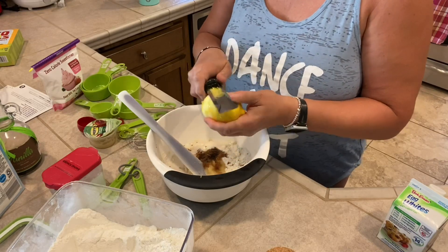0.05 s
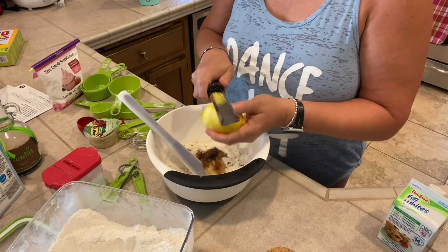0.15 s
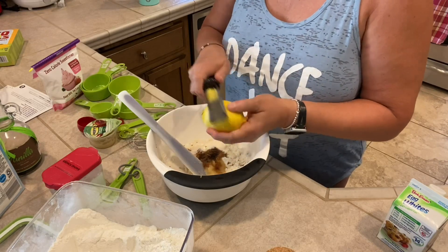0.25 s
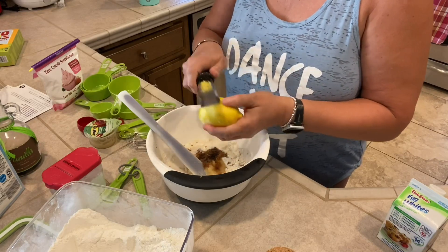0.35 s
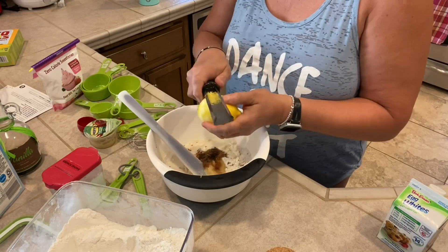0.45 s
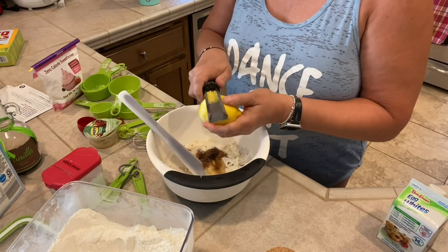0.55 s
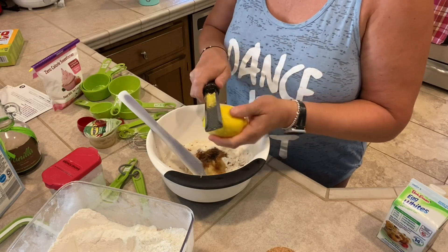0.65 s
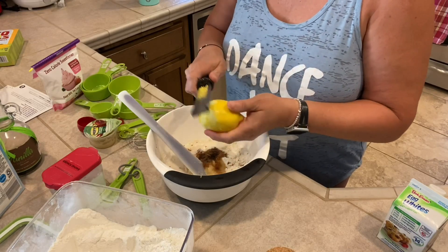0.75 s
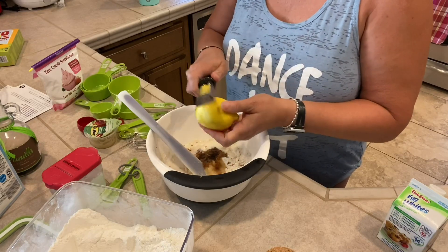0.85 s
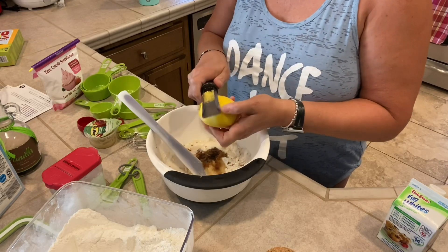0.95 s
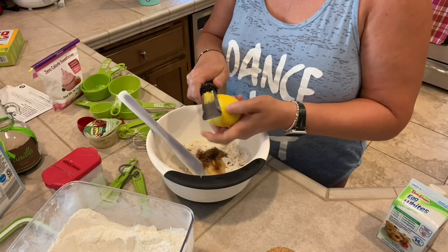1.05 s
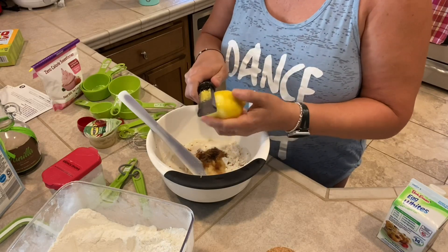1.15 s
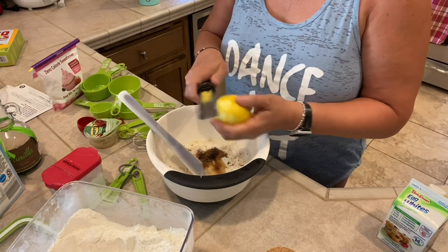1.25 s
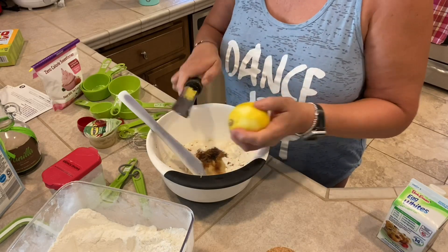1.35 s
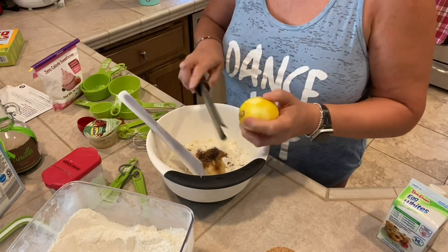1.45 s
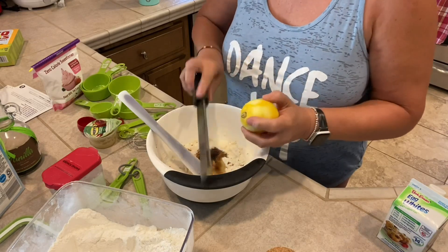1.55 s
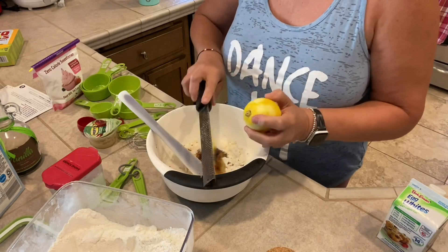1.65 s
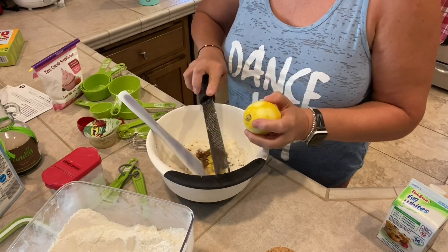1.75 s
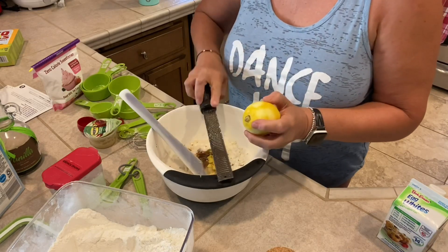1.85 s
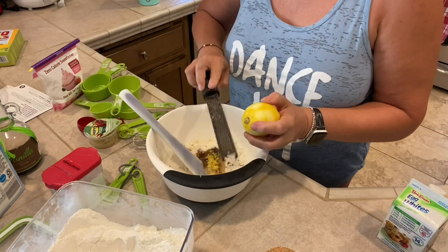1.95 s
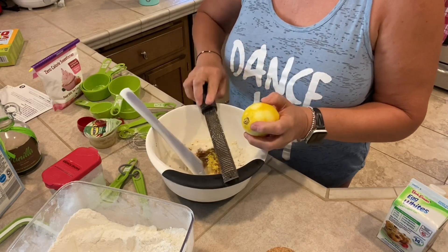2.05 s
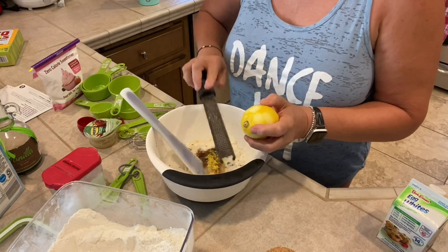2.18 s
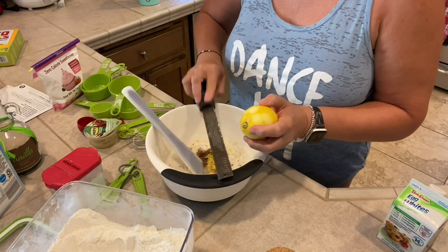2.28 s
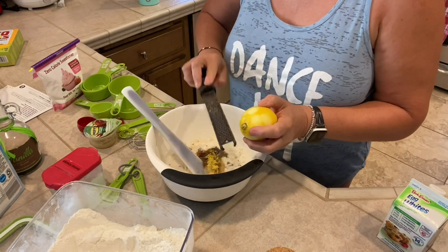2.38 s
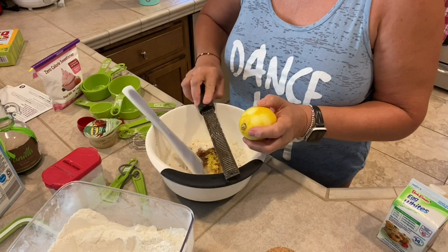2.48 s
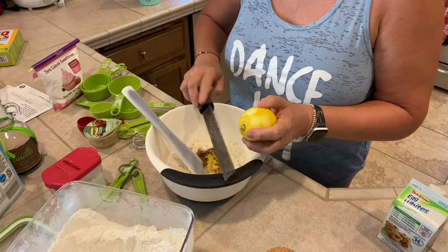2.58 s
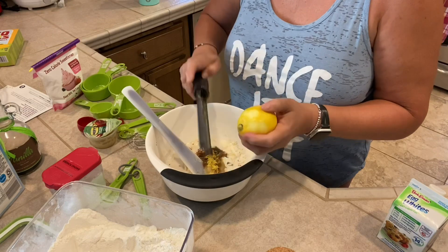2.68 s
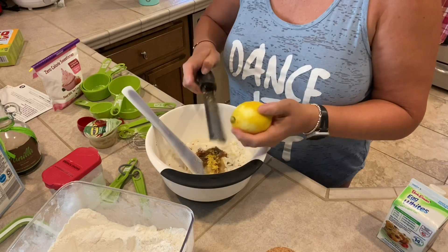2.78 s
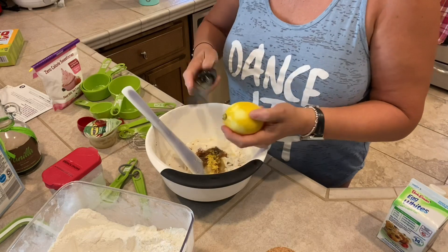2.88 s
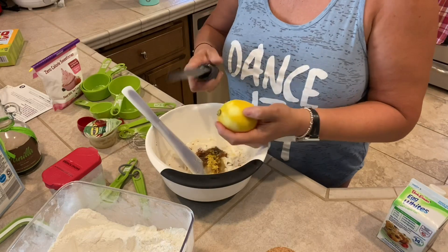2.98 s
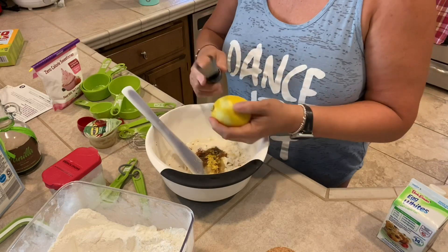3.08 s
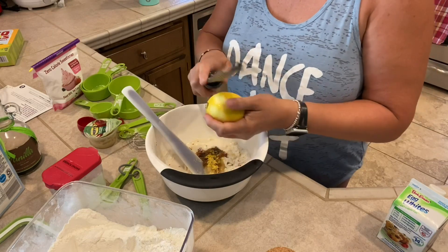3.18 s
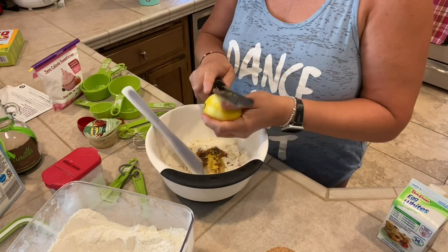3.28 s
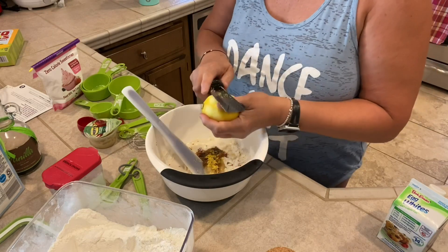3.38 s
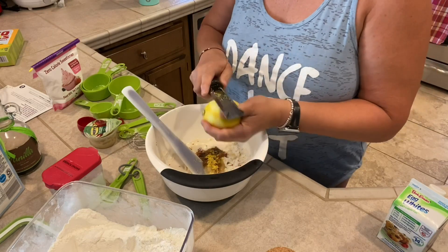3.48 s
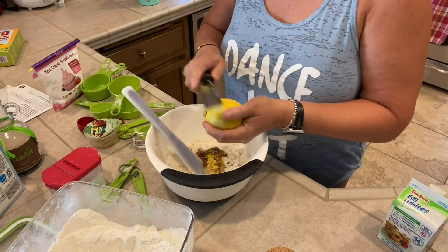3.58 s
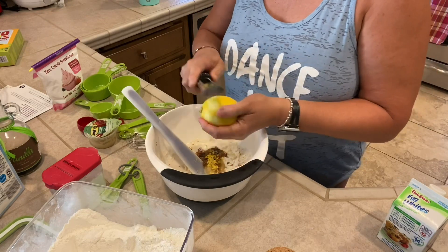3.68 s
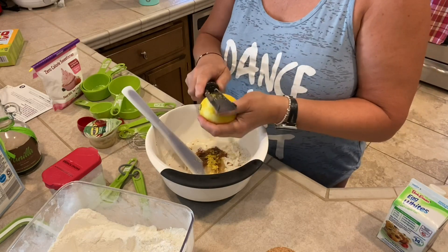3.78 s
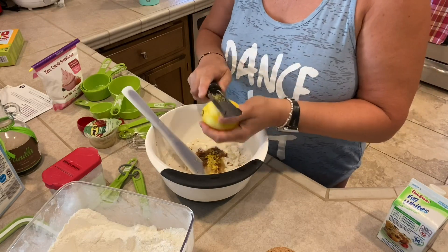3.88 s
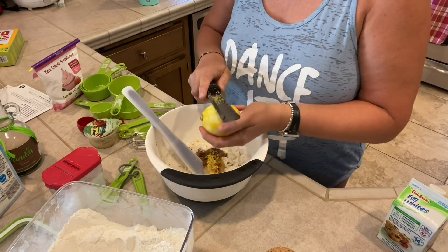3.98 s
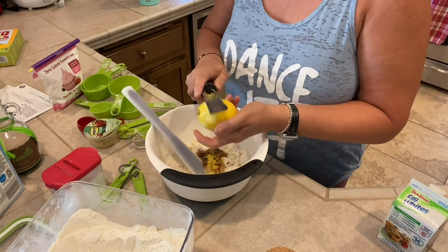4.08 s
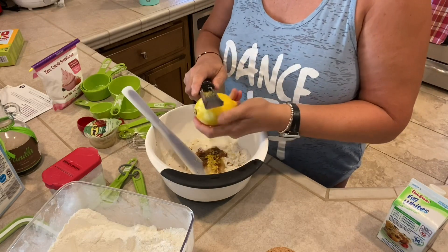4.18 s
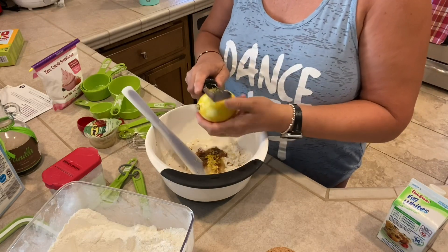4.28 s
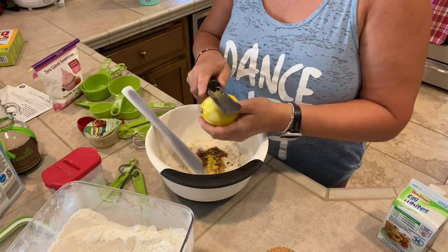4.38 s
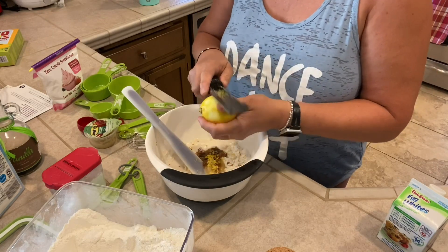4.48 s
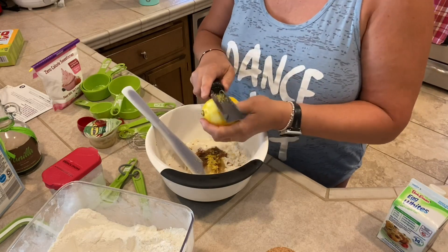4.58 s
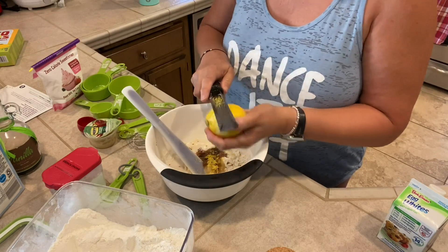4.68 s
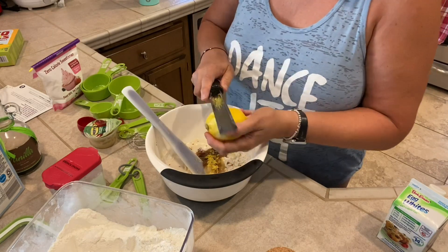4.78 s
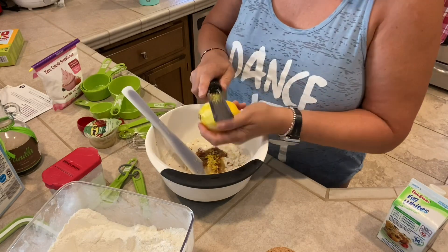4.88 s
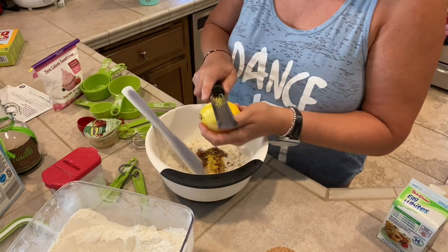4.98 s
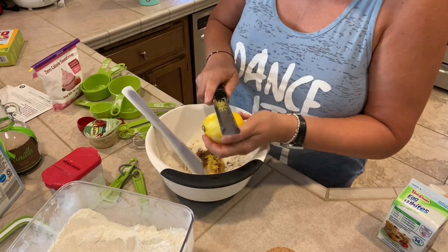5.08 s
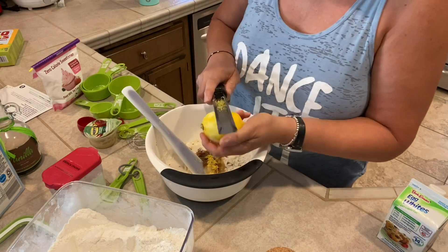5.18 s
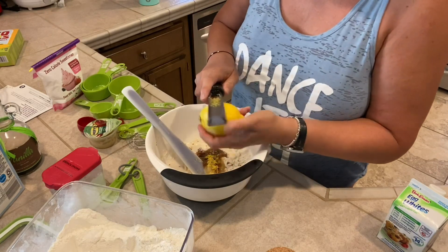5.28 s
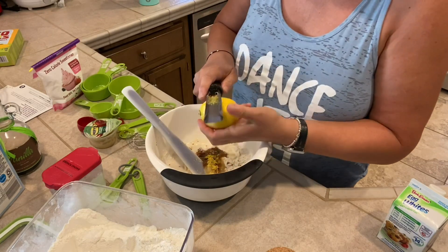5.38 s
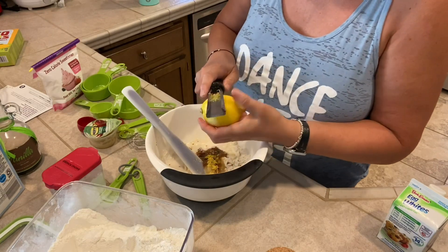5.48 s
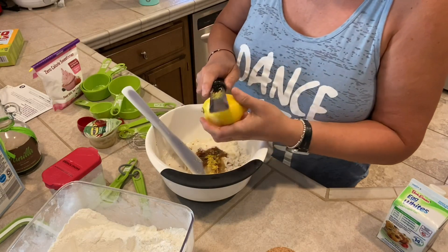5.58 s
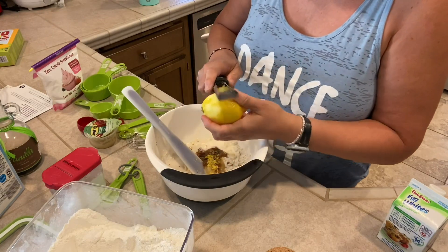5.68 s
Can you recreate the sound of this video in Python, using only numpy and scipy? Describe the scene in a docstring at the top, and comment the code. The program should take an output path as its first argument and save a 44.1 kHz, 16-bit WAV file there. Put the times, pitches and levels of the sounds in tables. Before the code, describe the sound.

A handheld steel zester scrapes lemon skin in brief, quiet, grainy strokes with a slight metallic ring. Between the second and third strokes, five loud hollow knocks on a plastic bowl run about a fifth of a second apart, the first weak. Scraping then resumes in short rasps, ending with a light graze and dull rubs. Close microphones, short bright room echo, steady low motor hum beneath.

```python
"""Lemon zesting over a bowl

A lemon is drawn over a hand zester in short strokes: a dense patter of tiny tears that rings the blade.
Between the second and third strokes come five knocks: the zester meets the rim, and an instant later the
plastic bowl thumps. Both are decaying mode pairs with a noise snap and rattle. Soft rubs, small ticks and
low counter thuds fill in around them. A tiled kitchen answers with dense echoes of noise. Appliances rumble
and hum underneath as coloured noise and wavering tones, and two close microphone ports hear it all."""
import sys
import numpy as np
from scipy import signal
from scipy.fft import rfft, irfft, next_fast_len
from scipy.io import wavfile

SR = 44100
rng = np.random.default_rng(int(sys.argv[2]) if len(sys.argv) > 2 else 0)


def dump(signal):
    """Clip the signal to [-1, 1] and save it as 16-bit WAV at the path in sys.argv[1]."""
    limited = np.clip(np.atleast_2d(signal).T, -1, 1)
    pcm = np.round(limited * 32767).astype(np.int16)
    wavfile.write(sys.argv[1], SR, pcm)


N = 253414
PAD = next_fast_len(N + SR)   # room for tails beyond the end
BINS = np.maximum(np.arange(PAD // 2 + 1) * SR / PAD, 1)   # Hz of each frequency bin


def from_db(db):
    """Decibels to an amplitude factor."""
    return 10 ** (np.asarray(db) / 20)


def rms_one(x):
    """Scale to an RMS of 1."""
    return x / np.sqrt(np.mean(x ** 2) + 1e-20)


def at_hz(points):
    """A (Hz, value) table read at every frequency bin, straight on a log axis."""
    hz, value = np.transpose(points)
    return np.interp(np.log(BINS), np.log(np.maximum(hz, 1)), value)


def shaped(x, response):
    """Filter by a response given at every frequency bin."""
    return irfft(rfft(x, PAD) * response, PAD)[..., :N]


def pair(spectra, alike):
    """Two unrelated spectra mixed into left and right: likeness 1 is the same, -1 is opposite."""
    alike = np.clip(at_hz(alike), -1, 1)
    shared = np.sqrt(1 + alike) * spectra[0]
    opposed = np.sqrt(1 - alike) * spectra[1] * [[1], [-1]]
    return (shared + opposed) / np.sqrt(2)


def drift(rate_hz):
    """Random wandering of spread 1: noise smoothed by two equal poles."""
    r = np.exp(-2 * np.pi * rate_hz / SR)
    smooth = signal.lfilter([1], [1, -2 * r, r * r], rng.standard_normal(N + SR))
    return rms_one(smooth[SR:])   # the first second lets the filter settle


def resonate(x, hz, width_hz):
    """One resonance that passes its centre pitch at about unit level."""
    r = np.exp(-np.pi * width_hz / SR)
    feedback = [1, -2 * r * np.cos(2 * np.pi * hz / SR), r * r]
    return signal.lfilter([(1 - r * r) / 2, 0, (r * r - 1) / 2], feedback, x)


def ring(blows, hz, t60):
    """Each blow starts a sine that falls 60 dB in t60 seconds."""
    r, w = from_db(-60 / (t60 * SR)), 2 * np.pi * hz / SR
    return signal.lfilter([0, np.sin(w)], [1, -2 * r * np.cos(w), r * r], blows)


def clicks_at(times, sizes):
    """Single-sample impulses over a vanishing floor."""
    out = np.full(N, 1e-18)
    out[np.round(np.asarray(times) * SR).astype(int)] = sizes
    return out


def dying(x, t60):
    """Each impulse becomes an envelope that falls 60 dB in t60 seconds."""
    return signal.lfilter([1], [1, -from_db(-60 / (t60 * SR))], x)


# Stereo likeness of blade and bowl. Each row: frequency in Hz, left-right likeness from -1 to 1.
NEAR_LIKENESS = [(1500, 1), (3500, 0.22), (6000, 0.49), (8500, 1), (16000, 0.58)]


def wide(x, spectrum):
    """Two draws of a source, coloured and spread: a broad body sends each port a slightly different sound."""
    coloured = pair(rfft(x, PAD), NEAR_LIKENESS) * from_db(at_hz(spectrum))
    return rms_one(irfft(coloured, PAD)[:, :N])


# Colour of the tearing teeth. Each row: frequency in Hz, relative density in dB per Hz.
TEETH_COLOUR = [(400, -18.5), (800, -1.5), (1400, -3.5), (2300, -1.5), (3600, -2.5), (5000, -2.5),
                (6200, -4.5), (7800, -1.5), (9000, -5), (15800, -7)]
# Steel blade resonances. Each row: centre in Hz, width in Hz, level in dB relative to the patter feeding it.
BLADE_MODES = [(1515, 120, -10), (2880, 180, -5), (3350, 130, -2), (3563, 120, 3.5), (3840, 44, 4)]


def strokes():
    """Teeth tear the peel in a dense random patter that also rings the steel blade."""
    sizes_db = 3 * np.minimum(rng.exponential(1, (2, N)), 3)   # many small tears, few big ones
    sizes = from_db(sizes_db) * rng.choice([-1, 1], (2, N))
    tears = (rng.random(N) < 12000 / SR) * sizes   # about 12000 tears per second
    unevenness = from_db(1.1 * drift(40.0))
    patter = wide(tears * unevenness, TEETH_COLOUR)
    blade = sum(from_db(db) * resonate(patter, hz, width) for hz, width, db in BLADE_MODES)
    return pressure() * rms_one(patter + blade)


LANDING_DB_PER_S, EASING_DB, LIFTING_DB_PER_S = 605, 2.5, 318   # rise to the bite, later sag, fade after lift-off
# Zesting strokes. Each row: teeth bite in seconds, fullest in seconds, lift-off in seconds,
# level at the fullest in dB, bite below that level in dB.
ZEST_STROKES = [(.002, 0.1, .142, -48.5, 17), (0.461, 0.534, 0.59, -44, 22.5),
                (3.391, 3.44, 3.45, -47.5, 4), (3.785, 3.842, 3.882, -44.5, 8.5),
                (4.531, 4.62, 4.663, -45.5, 11), (4.958, 5.005, 5.038, -46, 6.5)]
# Light grazes of the teeth between strokes. Each row: fullest in seconds, swell in seconds,
# fade in seconds (each over 20 dB), level at the fullest in dB.
TOOTH_GRAZES = [(.392, .02, 0.092, -67), (.918, .07, 0.13, -67.5), (1.2, 0.084, 0.079, -64.5),
                (1.294, 0.038, 0.04, -61.5), (1.47, 0.18, 0.3, -67), (2.835, .15, 0.051, -64.5),
                (2.989, 0.11, 0.096, -75), (3.08, 0.11, .3, -73), (3.24, .03, 0.092, -77.5),
                (3.725, 0.028, 0.044, -74.5), (4.08, 0.074, 0.097, -67.5), (4.39, .12, 0.14, -72.5),
                (4.88, 0.032, 0.056, -71), (5.3, 0.12, 0.056, -60), (5.54, 0.078, .15, -82)]


def pressure():
    """How hard the teeth cut: each stroke lands, builds, sags a little and lifts off; grazes swell and fade."""
    t = np.arange(N) / SR
    out = 0
    for bite, fullest, lift, db, below_db in ZEST_STROKES:
        shape_db = np.interp(t, [bite, fullest, lift], [-below_db, 0, -EASING_DB])
        landing_db = LANDING_DB_PER_S * np.maximum(bite - t, 0)
        lifting_db = LIFTING_DB_PER_S * np.maximum(t - lift, 0)
        out = out + from_db(db + shape_db - landing_db - lifting_db)
    for fullest, swell, fade, db in TOOTH_GRAZES:
        distance = np.maximum((fullest - t) / swell, (t - fullest) / fade)
        out = out + from_db(db - 20 * distance)
    return out


# Colour of the loose rattle. Each row: frequency in Hz, relative density in dB per Hz.
CLATTER_COLOUR = [(250, -21), (600, -8), (1200, -3), (2300, -1), (3500, -8.5), (5500, -13), (8000, -13.5),
                  (16000, -25)]


def struck(hits, modes, spread_db, swell_cycles, rattle_t60):
    """Blows ring mode pairs by chance amounts, hardness tilting the highs; a bright snap and uneven rattle join."""
    s, drive_db, hardness, snap_db, rattle_db = np.transpose(hits)
    luck = rng.standard_normal((len(s), len(modes), 2))
    ringing = 0
    for k, (low_hz, spacing, level_db, t60) in enumerate(modes):
        for twin, hz in enumerate([low_hz, low_hz + spacing]):
            tilt_db = hardness * np.log2(hz / 400)
            db = drive_db + level_db + tilt_db + spread_db * luck[:, k, twin]
            blows = clicks_at(s, from_db(db) * (-1) ** k)   # neighbouring modes start in opposite directions
            # taking away a second decay makes the mode swell in; low modes swell later
            ringing = ringing + ring(blows, hz, t60) - ring(blows, hz, swell_cycles / hz)
    snap = dying(clicks_at(s, from_db(snap_db)), .008) * rng.standard_normal(N)
    snap = signal.sosfilt(signal.butter(1, 2000.0, "high", fs=SR, output="sos"), snap)
    uneven = from_db(2 * drift(300))
    clatter = wide(rng.standard_normal((2, N)), CLATTER_COLOUR)
    rattle = uneven * dying(clicks_at(s, from_db(rattle_db)), rattle_t60) * clatter
    return ringing + snap + rattle


# The bowl thumps. Each row: start in seconds, drive in dB, hardness in dB per octave about 400 Hz,
# snap drive in dB, rattle start in dB.
BOWL_THUMPS = [(1.5315, -20.5, 1.5, -41, -33), (1.785, -12, 1.5, -15.5, -31.5),
               (1.9745, -8, 2, -20.5, -23.5), (2.205, -13.5, -0.5, -25.5, -34),
               (2.4075, -6.5, 1.5, -23.5, -26)]
# Bowl modes in close pairs. Each row: lower pitch in Hz, pair spacing in Hz, relative drive in dB, t60 in seconds.
BOWL_MODES = [(70.5, 6, -21, 0.082), (110.4, 16, -12.5, 0.15), (158, 14, -12, 0.16),
              (219.5, 17.8, -5, 0.05), (358.6, 29.5, -3.5, 0.098), (513.5, 20, -7.5, 0.053),
              (551.5, 25, -11, 0.072), (622.4, 22, -16, 0.073), (718, 18.3, -23, 0.27),
              (1053, 27, -3, 0.006)]


def thumps():
    """The plastic bowl booms in low mode pairs that swell in after each blow."""
    return struck(BOWL_THUMPS, BOWL_MODES, spread_db=2.0, swell_cycles=2.35, rattle_t60=0.086)


# Zester meets the rim. Each row: start in seconds, drive in dB, hardness in dB per octave about 400 Hz,
# snap drive in dB, rattle start in dB.
RIM_KNOCKS = [(1.5304, -28.5, -2.5, -38.5, -41.5), (1.771, -22.5, 0.5, -35, -34.5),
              (1.968, -18, 0.5, -38.5, -29), (2.1905, -20, -1, -32.5, -30.5),
              (2.3995, -20, -1.5, -31.5, -29)]
# Rim modes in close pairs. Each row: lower pitch in Hz, pair spacing in Hz, relative drive in dB, t60 in seconds.
RIM_MODES = [(566.6, 56, 7, 0.033), (888, 27, -11, 0.027), (1139, 39, -3, 0.068), (1730, 30, -11.5, .03)]


def rim():
    """A round rim rings briefly in close mode pairs when the zester meets it."""
    return struck(RIM_KNOCKS, RIM_MODES, spread_db=4.5, swell_cycles=8.5, rattle_t60=0.17)


COUNTER_HZ, COUNTER_T60_S = 68, 0.17
# The counter's answers. Each row: start in seconds, drive in dB.
COUNTER_THUDS = [(1.584, -35.5), (1.851, -33), (2.256, -24.5)]


def thuds():
    """The counter answers with one low mode that swells in softly before it decays."""
    s, db = np.transpose(COUNTER_THUDS)
    pushes = clicks_at(s, from_db(db))
    return ring(pushes, COUNTER_HZ, COUNTER_T60_S) - ring(pushes, COUNTER_HZ, 0.027)


# Dull rubs of hand, fruit and blade between strokes. Each row: start in seconds, swell in seconds,
# fade in seconds, level at the fullest in dB, top of the band in Hz.
DULL_RUBS = [(.19, 0.1, 0.094, -58.5, 1090), (1.162, 0.03, 0.16, -67.5, 1160),
             (3.1, 0.072, .1, -89.5, 1500), (4.289, 0.034, 0.17, -65.5, 2420),
             (5.151, 0.11, 0.2, -83.5, 1160), (5.439, 0.08, 0.12, -66, 2490),
             (5.6, 0.044, .08, -75.5, 1320)]


def rubs():
    """Lumpy noise that swells and fades, with little above its top pitch."""
    t = np.arange(N) / SR
    noise = rng.standard_normal(N) * from_db(1.5 * drift(40))
    out = 0
    for s, swell, fade, db, top_hz in DULL_RUBS:
        band = signal.sosfilt(signal.butter(5, [450.0, top_hz], "band", fs=SR, output="sos"), noise)
        envelope = np.interp(t, [s, s + swell, s + swell + fade], [0, 1, 0])
        out = out + from_db(db) * envelope * rms_one(band)
    return out


# Small ticks of blade, nail and bracelet. Each row: start in seconds, drive before the resonance in dB, centre in Hz.
SMALL_TICKS = [(0.3873, -42.5, 2970), (.4479, -64, 12000), (.482, -54, 9000), (.8574, -55, 12000),
               (0.882, -51.5, 11000), (1.186, -57.5, 3200), (1.2037, -57, 5000), (1.216, -47.5, 8000),
               (1.293, -34.5, 5000), (1.3487, -47.5, 10800), (1.7574, -65, 4626), (3.5364, -47, 9050)]


def ticks():
    """Millisecond noise bursts, each through one broad resonance."""
    noise = rng.standard_normal(N)
    out = 0
    for s, db, hz in SMALL_TICKS:
        burst = dying(clicks_at(s, from_db(db)), 0.013) * noise
        out = out + resonate(burst, hz, 1.1 * hz)
    return out


# Kitchen decay. Each row: frequency in Hz, t60 in seconds.
KITCHEN_T60 = [(60, 0.38), (500, 0.46), (3000, 0.56), (8000, 0.39), (16000, 0.77)]
# Kitchen echo colour. Each row: frequency in Hz, echo level in dB.
KITCHEN_LEVEL = [(60, -8), (400, -6.5), (2000, -7.5), (10000, -13)]
# Stereo likeness of the echoes. Each row: frequency in Hz, left-right likeness, held within -1 to 1.
KITCHEN_LIKENESS = [(60, 1), (200, 0.93), (500, 0.34), (1100, -0.53), (2000, -0.38), (6500, -0.12),
                    (9000, 1), (16000, -1.2)]


def kitchen(x):
    """Dense echoes: noise that dies band by band, starting after the first walls answer."""
    t = np.arange(int(.8 * SR)) / SR
    edges = 40 * 2 ** np.arange(0, 9, .75)   # band edges in Hz, three quarters of an octave apart
    hz, t60 = np.transpose(KITCHEN_T60)
    echoes = 0
    for low, high in zip(edges, edges[1:]):
        sos = signal.butter(2, [low, high], "band", fs=SR, output="sos")
        band = signal.sosfilt(sos, rng.standard_normal((2, len(t))))
        band_t60 = np.interp(np.log(low * high) / 2, np.log(hz), t60)   # read at the band's middle
        echoes = echoes + band * from_db(-60 * t / band_t60)
    echoes *= np.clip((t - .004) / 0.0014, 0, 1)   # silent for 4 ms, then a quick fade in
    echoes /= np.sqrt(np.sum(echoes ** 2) / 2)
    response = pair(rfft(echoes, PAD), KITCHEN_LIKENESS) * from_db(at_hz(KITCHEN_LEVEL))
    return shaped(x, response)


RUMBLE_DB = -48   # RMS of the rumble and hiss together
# Rumble and hiss colour. Each row: frequency in Hz, relative density in dB per Hz.
RUMBLE_COLOUR = [(20, -20.5), (40, -22), (50, 5), (68, 0.5), (91, -11.5), (128, -3.5), (150, -15.5),
                 (240, -17.5), (305, -14), (840, -31), (1500, -63.5), (5000, -57.5), (9000, -59.5),
                 (16000, -59)]
# Stereo likeness of the rumble. Each row: frequency in Hz, left-right likeness from -1 to 1.
RUMBLE_LIKENESS = [(60, 0.97), (170, 0.95), (350, 0.168), (900, -0.62), (2000, -0.073), (6000, -0.84),
                   (9000, 1), (16000, 0.6)]
# Wavering motor tones. Each row: pitch in Hz, width in Hz, RMS level in dB.
MOTOR_TONES = [(117.3, 1, -56), (290.3, 5, -62)]


def appliances():
    """Low rumble fading into faint hiss, with motor tones that waver like narrow noise."""
    noise = rfft(rng.standard_normal((2, PAD)))
    coloured = pair(noise, RUMBLE_LIKENESS) * from_db(at_hz(RUMBLE_COLOUR))
    rumble = irfft(coloured, PAD)[:, :N]
    tones = 0
    for hz, width, db in MOTOR_TONES:
        tone = resonate(rng.standard_normal(N + SR), hz, width)[SR:]   # already settled at the start
        tones = tones + from_db(db) * rms_one(tone)
    return from_db(RUMBLE_DB) * rms_one(rumble) + tones


def scene():
    """Close sounds, their kitchen echoes and the appliances beneath."""
    near = strokes() + thumps() + rim() + thuds() + rubs() + ticks()
    return near + kitchen(near.mean(axis=0)) + appliances()


CUTOFF_HZ = 16700
# Phase between the ports. Each row: frequency in Hz, lead of the right port in radians.
PORT_PHASE = [(20, 0), (180, .2), (700, .9), (1200, .4), (3000, 2.1), (5500, 3), (6800, 4.4), (8100, 4.2),
              (9200, 3.1), (10000, 2.8), (11300, .3), (12500, -.2), (14200, -3), (16000, -3.3)]
# Level between the ports. Each row: frequency in Hz, left over right in dB.
PORT_LEVEL = [(40, 3), (200, -1), (1200, -1.5), (3500, -1), (5000, -2), (7600, 1.5), (9000, 0),
              (16000, -0.5)]


def record(dry):
    """The two ports hear with unequal delays and colour; the highest peaks are rounded and the top is cut."""
    sides = np.array([[-.5], [.5]])   # left and right each take half the difference
    ports = np.exp(1j * at_hz(PORT_PHASE) * sides) * from_db(-at_hz(PORT_LEVEL) * sides)
    rounded = 1.3 * np.tanh(shaped(dry, ports) / 1.3)
    return signal.sosfilt(signal.cheby2(14, 70, CUTOFF_HZ, fs=SR, output="sos"), rounded)


dry = scene()
out = record(dry)
dump(out)
```